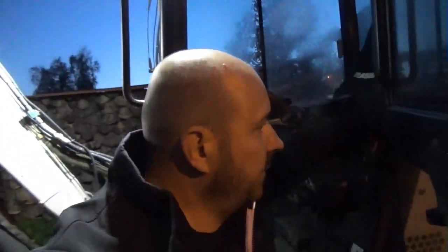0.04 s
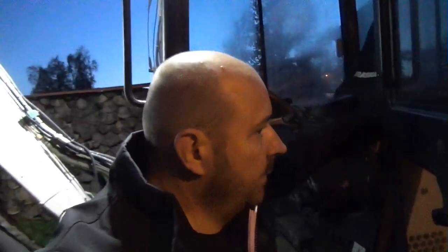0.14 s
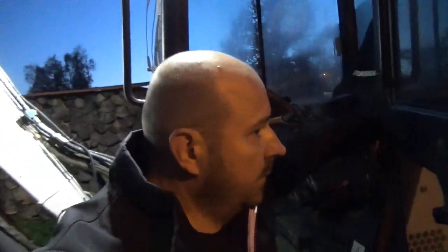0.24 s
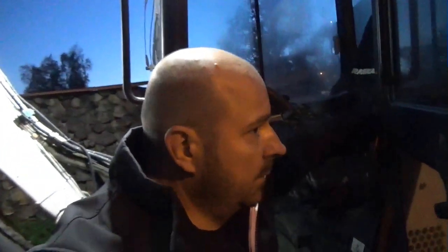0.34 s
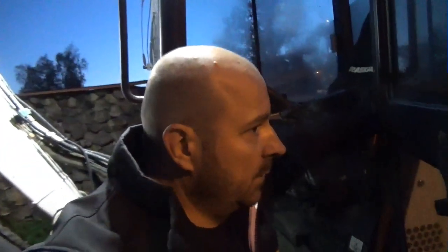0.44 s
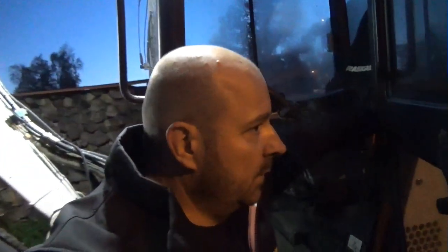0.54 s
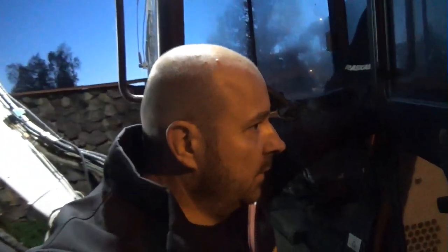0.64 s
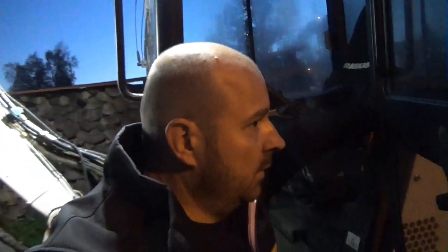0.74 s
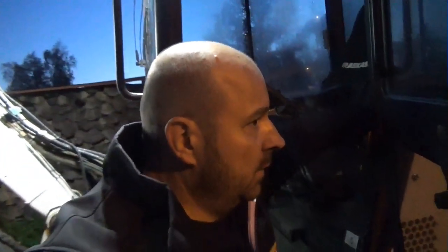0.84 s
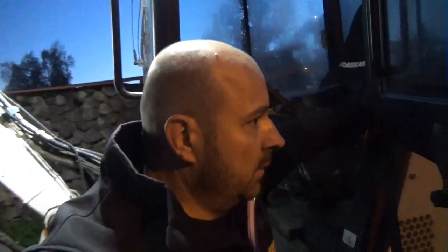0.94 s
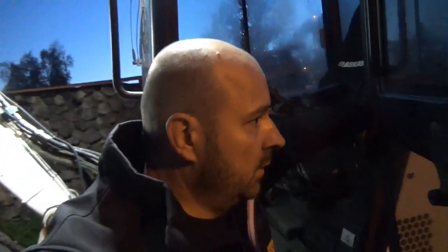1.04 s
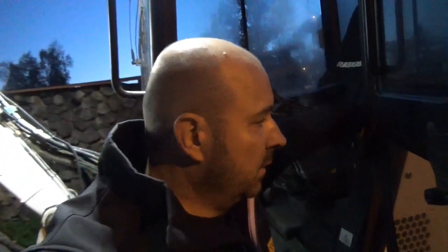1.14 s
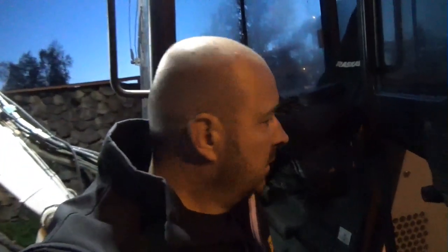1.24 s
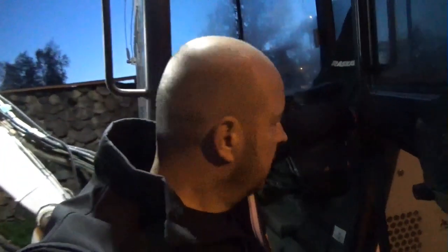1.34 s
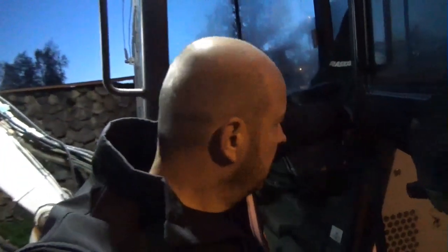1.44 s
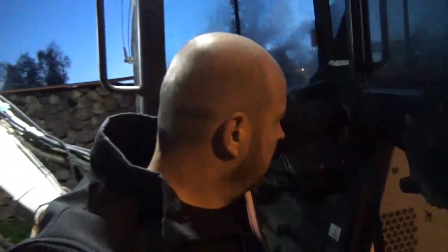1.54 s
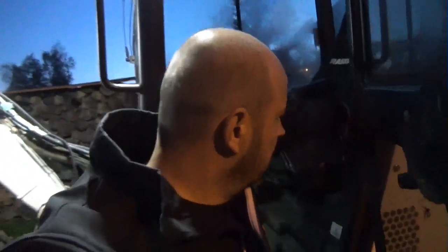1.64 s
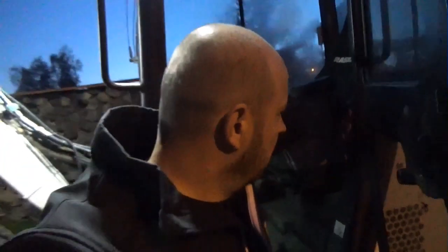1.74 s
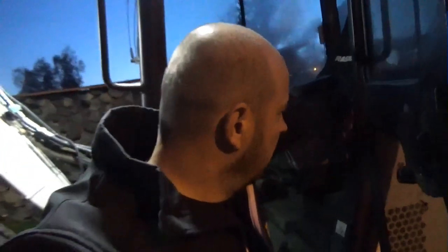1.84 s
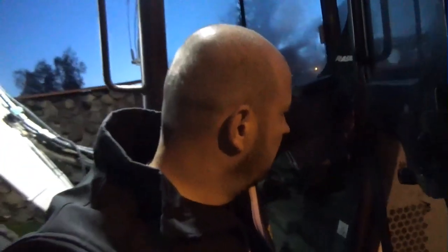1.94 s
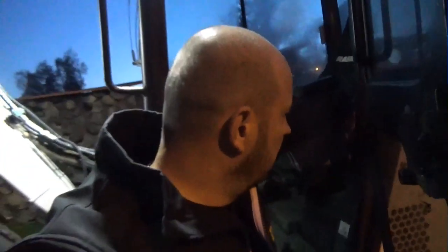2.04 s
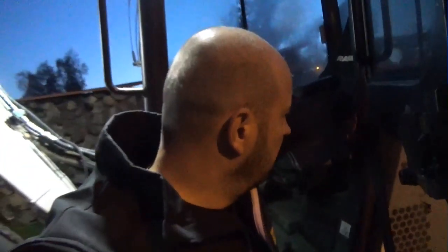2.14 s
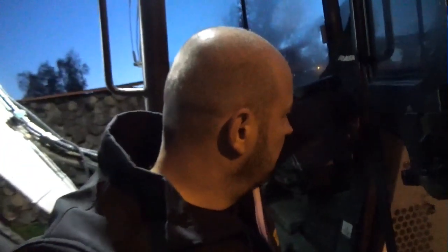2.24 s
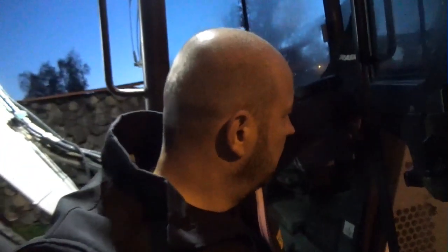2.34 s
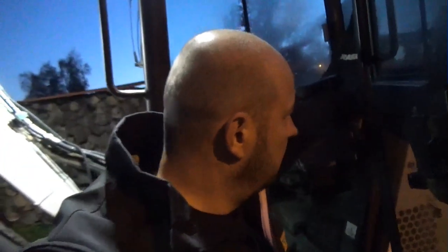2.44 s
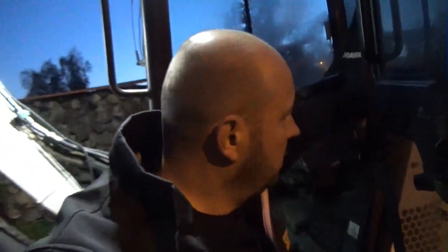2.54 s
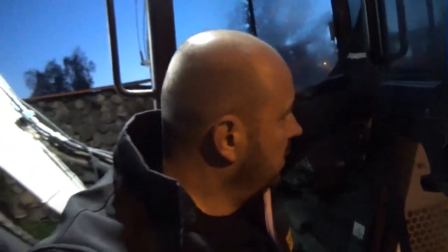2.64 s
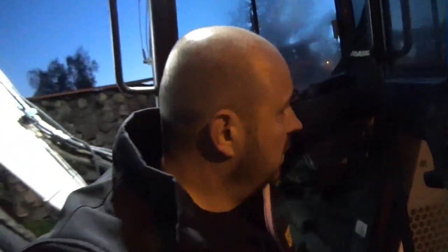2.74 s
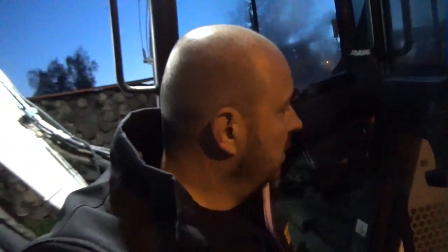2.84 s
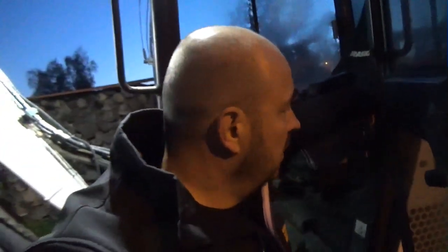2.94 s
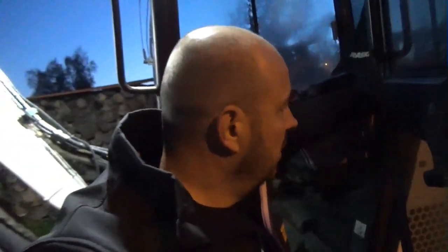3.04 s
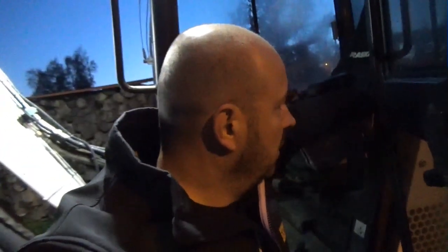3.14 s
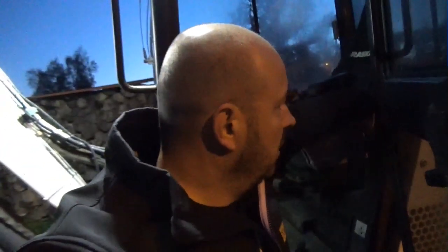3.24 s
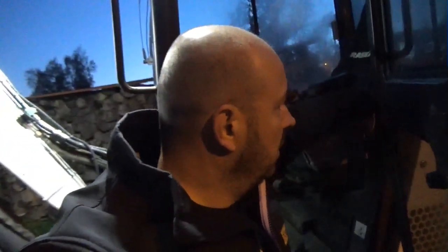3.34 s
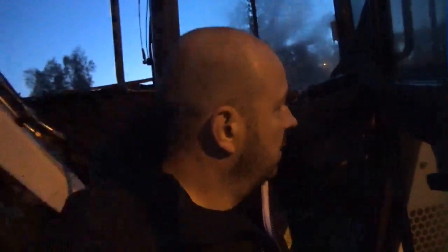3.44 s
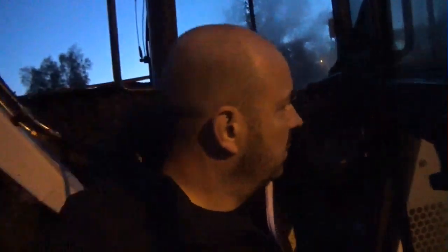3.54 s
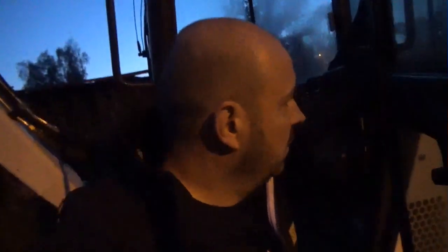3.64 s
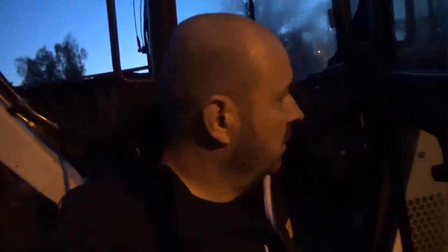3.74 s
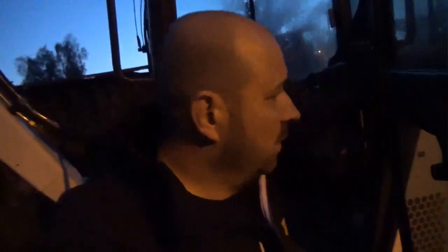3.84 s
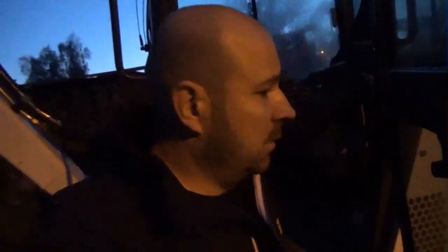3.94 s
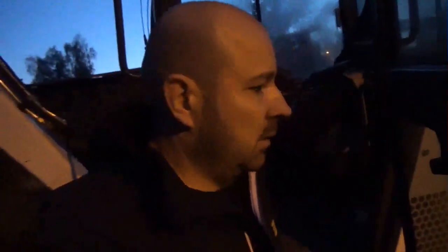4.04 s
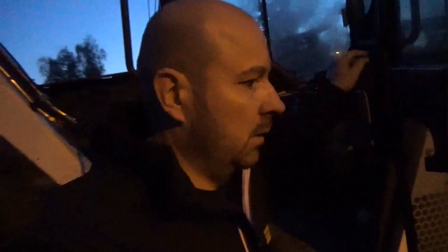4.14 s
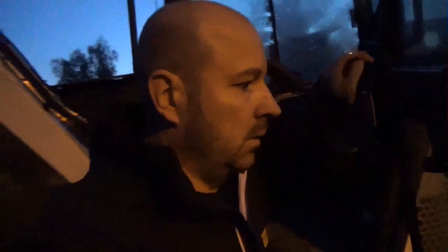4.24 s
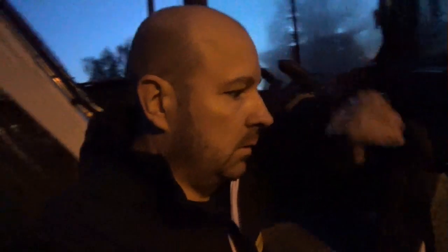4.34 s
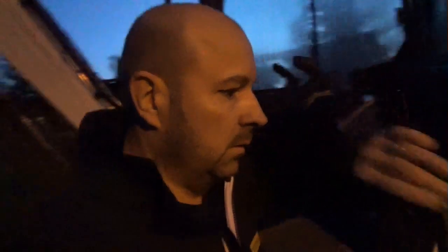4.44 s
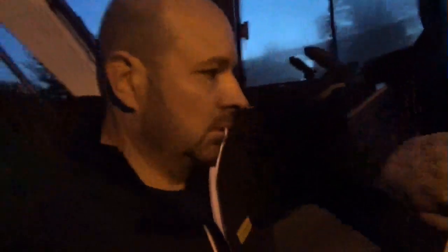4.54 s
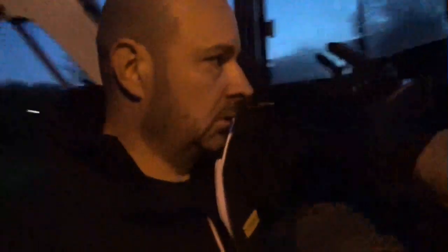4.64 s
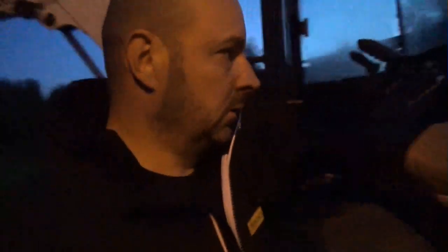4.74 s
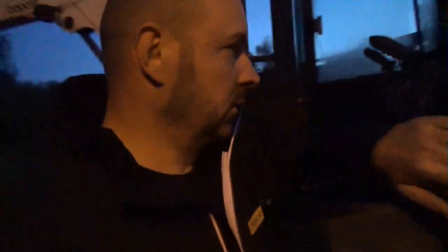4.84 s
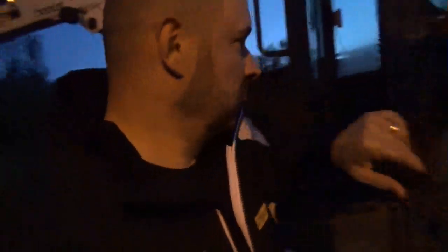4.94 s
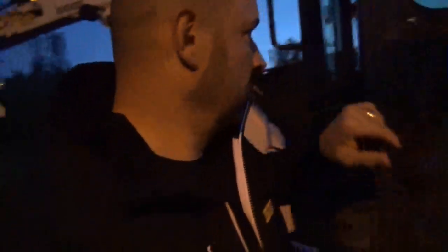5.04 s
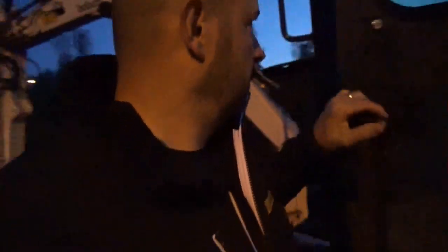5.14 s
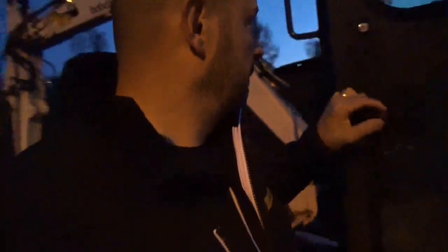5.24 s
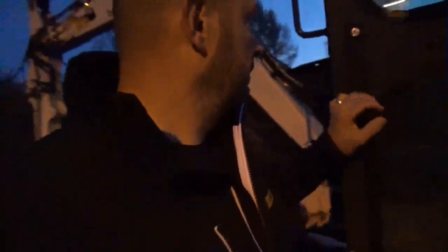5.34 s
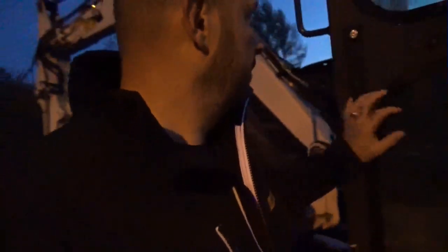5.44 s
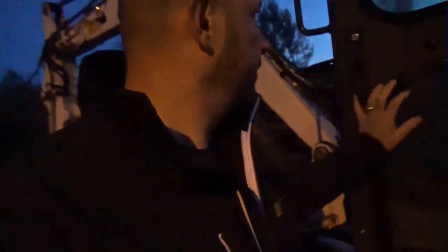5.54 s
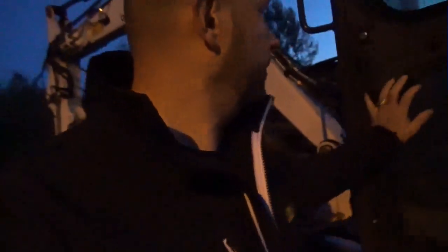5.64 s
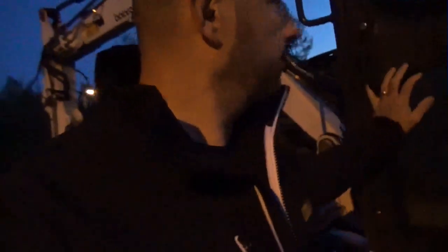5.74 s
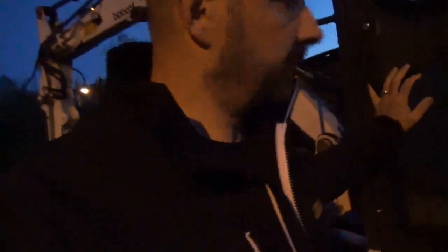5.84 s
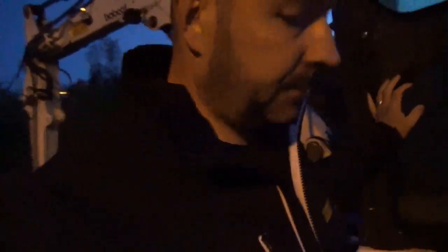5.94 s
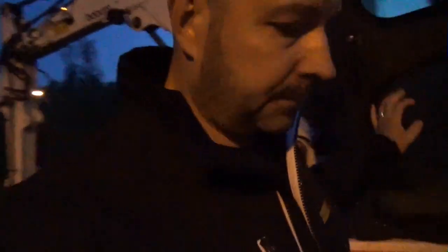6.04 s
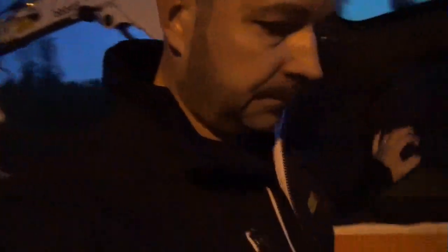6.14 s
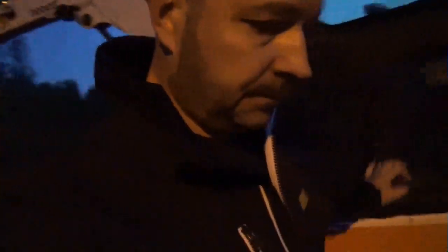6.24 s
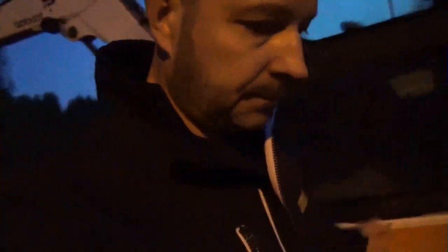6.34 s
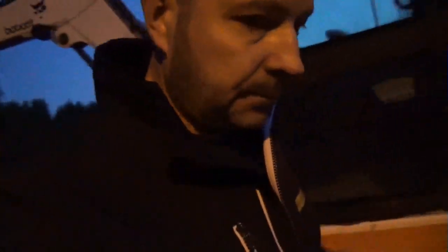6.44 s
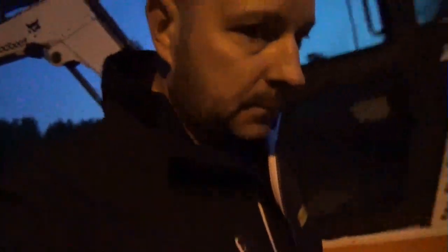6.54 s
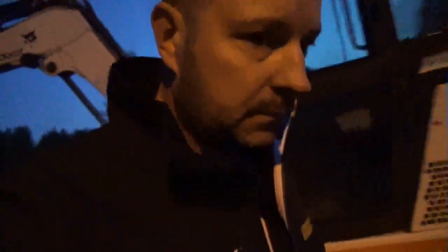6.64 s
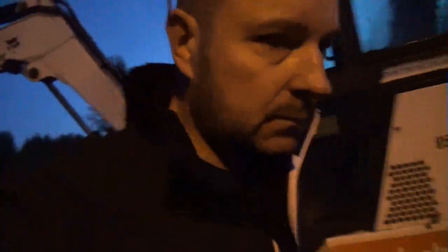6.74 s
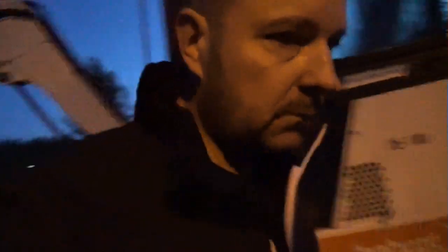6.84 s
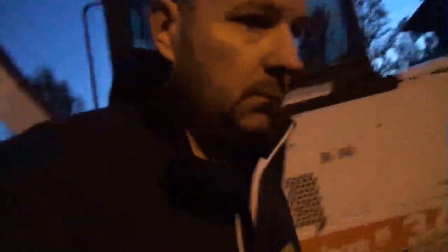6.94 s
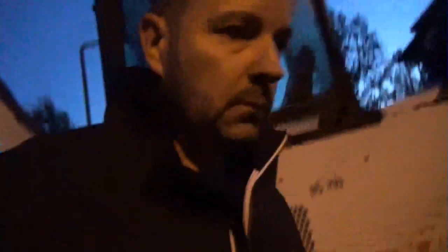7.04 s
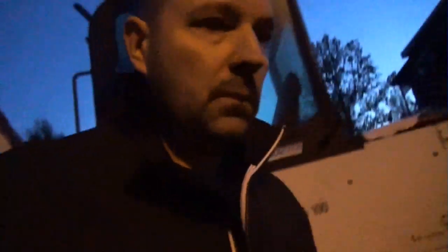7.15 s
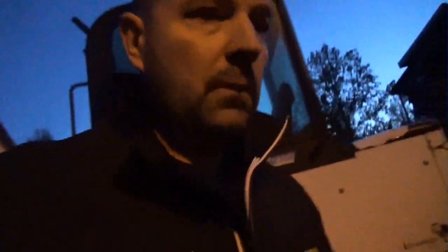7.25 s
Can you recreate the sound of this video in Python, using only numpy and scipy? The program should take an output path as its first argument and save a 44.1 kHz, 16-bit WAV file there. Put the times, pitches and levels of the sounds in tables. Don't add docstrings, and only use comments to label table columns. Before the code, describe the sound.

Over low far-off traffic and rustling cloth, metal catches click, a hinge scrapes and squeaks, a heavy cab door slams, and boots crunch grit.

```python
import sys
import numpy as np
from scipy import signal
from scipy.fft import rfft, irfft, next_fast_len
from scipy.io import wavfile
from scipy.ndimage import uniform_filter1d

SR = 44100
rng = np.random.default_rng(int(sys.argv[2]) if len(sys.argv) > 2 else 0)


def wrap_up_sound(samples):
    columns = np.atleast_2d(samples).T
    tamed = np.clip(columns, -1, 1)
    steps = np.round(tamed * 32767).astype(np.int16)
    wavfile.write(sys.argv[1], SR, steps)


def boost(x):
    u = np.asarray(x, float) / 20
    return 10 ** u


N = 322371

# time in s, tyre roar in
# dB, left minus right in dB, tyre note in Hz.
ROAD = [(0.0, -34, 4.5, 990), (0.75, -30.5, 4.5, 1160), (1.4, -31, 5.5, 980), (2.12, -32, 5, 870),
        (3.1, -33, 4.5, 960), (4.2, -32.5, 3.5, 1100), (4.8, -34.5, 3.5, 990), (5.6, -35.5, 2, 950),
        (5.9, -40.5, -1.5, 900), (6.5, -40.5, 4.5, 920), (7.04, -35, -4, 854), (7.31, -37, 2, 1010)]
# frequency in Hz, density in dB per Hz.
RUMBLE = [(15, -50), (35, -48), (60, -38), (85, -1.5), (110, 3.5), (140, 2), (190, -24), (300, -56)]
EXHAUST = [(100, -35), (180, -2), (330, -2), (520, -5), (900, -37)]
ROAR = [(250, -34), (550, -5.5), (950, -4), (1300, -5), (1840, -7), (2810, -19.5), (5000, -28.5),
        (11000, -51)]
RUSTLE = [(1180, -10), (2000, -6.5), (2460, -2.5), (3910, -5), (6820, -0.5), (10600, -3), (11000, -9),
          (14300, -48)]
# frequency in Hz, correlation as a ratio.
SAME = [(60, 1), (170, 0.93), (490, 0.92), (1390, 0.87), (3950, 1), (11200, 0.84)]
ROAR_MEAN_DB = -33
RUMBLE_DB, RUMBLE_FOLLOWS, RUMBLE_FADE_DB_PER_S = -39, 0.29, -0.29
EXHAUST_DB, EXHAUST_FOLLOWS, EXHAUST_RISE_DB_PER_S = -41.5, 0.46, 0.61

# start in s, length in s, level in dB.
DRONE = [
    (5.118, 0.5, -40.5),
    (6.403, 0.44, -42.5),
]
DRONE_HZ, DRONE_CLIMB_HZ_PER_S = 267, 11.6

# middle in s, half length in s, rubbing level in dB.
STROKES = [(0.018, 0.1, -41), (0.29, 0.13, -43), (0.575, 0.11, -42.5), (0.847, 0.09, -57),
           (1.075, 0.098, -48), (1.44, 0.096, -42), (1.804, 0.067, -44.5), (2.462, 0.17, -43.5),
           (2.663, 0.065, -42.5), (2.952, 0.091, -46.5), (4.09, 0.17, -38.5), (4.328, 0.074, -39.5),
           (4.554, 0.11, -38), (4.915, 0.28, -38), (5.652, 0.12, -38), (5.87, 0.11, -42.5),
           (6.264, 0.038, -43), (6.452, 0.051, -48), (6.606, .1, -49), (6.88, 0.12, -38.5), (7, 0.063, -34),
           (7.205, 0.094, -32.5)]
REST_DB = -50.5

# time in s, scrape level in dB.
SWING = [(4.86, -44), (4.92, -29.5), (5.0, -27.5), (5.15, -28), (5.22, -34), (5.3, -34.5), (5.38, -39),
         (5.46, -54)]
# frequency in Hz, width in Hz, level in dB.
HINGE = [(4570, 61, -0.5), (6290, 31, 5.5), (6920, 37, -11), (7850, 210, 7), (9930, 850, 0.5)]
# start in s, length in s, frequency in Hz, level in dB, overtones in dB.
SQUEAKS = [(5.07, .06, 4050, -42, -6), (5.074, .034, 8090, -10.5, -40), (5.1, .011, 8000, -10.5, -40),
           (5.11, .011, 7960, -11, -40), (5.119, .014, 8050, -21, -40), (5.22, .026, 2490, -14, -36),
           (5.241, .019, 3075, -5.5, -30), (5.244, .016, 2620, -27, -40), (5.262, .016, 2540, -30, -40),
           (5.342, .014, 3130, -16, -13), (5.361, .037, 2500, -15.5, -19), (5.366, .01, 3030, -26, -25),
           (5.405, .02, 2480, -36, -40), (7.19, .065, 1040, -36, -40)]
# start in s, length in s, start frequency in Hz, level in dB, fall in Hz.
JUMPS = [
    (5.211, .016, 3020, -26, 420),
    (5.237, .009, 2550, -25, -450),
    (5.353, .013, 3120, -19, 260),
]
# start in s, length in s, frequency in Hz, level in dB.
WHISTLES = [
    (2.43, .018, 5500, -42),
    (2.44, .016, 5800, -38),
    (2.432, .016, 6200, -45),
    (5.07, 0.062, 11970, -5.5),
    (5.095, 0.059, 15800, -4),
]
SLIP_SAG_HZ = 35

# start in s, ring level in dB, ring frequency in Hz.
GRIT = [(0.505, -13, 7800), (4.567, -20, 3700), (4.6684, -28, 4500), (5.866, -23, 6920), (5.882, -21, 7400),
        (6.386, -19, 7400), (6.617, -8.5, 8600), (6.647, -20, 9240), (6.719, -7, 9800), (6.745, -20, 8680),
        (6.7805, -9, 8500), (6.799, -9, 7340), (6.8073, -5, 7600), (6.8295, -10, 8500), (6.927, -13, 8300),
        (6.933, -15, 8000), (6.975, -12, 8700), (7.076, -27, 6290)]
GRIT_LOW_HZ, GRIT_LOW_DB, GRIT_S = 1850, -27, 0.0014

# start in s, high ring in dB, its frequency in Hz, low ring in dB, its frequency in Hz.
TICKS = [(2.702, -23, 8950, -26.5, 2940), (4.487, -18, 5600, -20, 2820), (4.501, -21, 6500, -25, 3500),
         (4.5088, -8.5, 7880, -24, 5700), (4.554, -8, 7650, -21, 3300), (4.625, -16, 7850, -18.5, 3320),
         (4.8847, -9, 7800, -16.5, 2920), (6.3583, -11.5, 7950, -19.5, 4770),
         (6.696, -2.5, 7850, -26, 1640), (6.79, -5, 8800, -34, 4800), (6.807, -10, 7200, -36, 4800),
         (6.813, -3, 7760, -29, 2440), (6.9917, -6, 4950, -15, 2300)]
SPRING = [(4.4956, -22, 10000, -19, 3600), (4.518, -20, 10500, -28, 3500), (4.552, -13, 8500, -34, 3500),
          (4.632, -30, 7500, -33, 3100), (4.6784, -32, 7000, -26.5, 3700), (4.8847, -35, 4500, -24, 1520),
          (6.81, -13, 7600, -32, 4800)]
SNAPS = [
    (.7135, -14, 6900, -11, 3550),
    (3.468, -7, 7300, -20, 520),
    (3.5465, -14, 9300, -6, 3700),
]
BUMPS = [(5.628, -25, 4020, -23.5, 1190), (5.707, -30, 7600, -24, 940), (5.717, -12.5, 1890, -20, 784),
         (5.725, -32, 2580, -20, 290), (5.751, -9, 3040, -23, 420), (5.761, -9, 6300, -11.5, 690),
         (5.767, -12, 2980, -12.5, 950), (6.873, -12, 7500, -21, 1600), (6.881, -17, 2000, -22, 900),
         (6.941, -20, 8800, -22.5, 825), (7.013, -18.5, 1270, -25.5, 225), (7.048, -12, 5840, -13.5, 856),
         (7.048, -14, 2800, -22.5, 210)]
TICK_S, SNAP_S, BUMP_S = 0.0015, 0.0014, 0.0065
# start in s, level in dB, frequency in Hz, length in s.
THUDS = [(0.326, -30, 385, 0.039), (3.666, -32, 332, 0.008), (3.921, -38, 251, .015),
         (5.813, -19.5, 394, 0.043), (6.056, -34.5, 350, 0.0063), (6.102, -27.5, 320, 0.0098),
         (6.118, -30, 210, 0.03), (7.085, -36, 192, .0082)]
THUD_TOP_DB, THUD_TOP_RATIO = -9, 4.7

# start in s, frequency in Hz, peak in dB, t60 in s.
RINGS = [(3.4695, 633, -19, .04), (3.477, 398, -22.5, 0.14), (3.5462, 3700, -10, 0.013),
         (3.548, 594, -21, 0.096), (3.556, 3170, -21, 0.1), (4.7418, 7400, -14, 0.1),
         (4.7419, 6760, -13, .12), (4.745, 5820, -19, 0.15), (4.745, 2480, -19.5, .09),
         (4.751, 1952, -17.5, 0.099), (4.751, 1016, -15.5, 0.093), (4.764, 808, -23.5, .14),
         (5.7425, 183, -5, 0.078), (5.855, 561, -22, 0.28), (5.875, 480, -24, 0.15),
         (.7135, 3550, -17.5, 0.063), (.715, 453, -22, 0.045), (4.757, 450, -23.5, 0.092),
         (5.751, 103, -1.5, .09), (5.805, 574, -21, 0.18), (5.83, 450, -24, 0.17), (5.865, 306, -17, 0.13),
         (5.74, 400, -13, .08), (5.765, 654, -12, 0.084), (5.785, 298, -17, 0.11), (5.905, 175, -17, 0.1),
         (6.841, 410, -10.5, 0.037), (6.858, 480, -17, 0.056), (6.872, 327, -21, 0.052),
         (6.889, 456, -16, .05), (6.991, 2920, -20, 0.022), (7.0135, 895, -18, 0.021),
         (6.876, 1000, -22, .04), (6.8805, 1470, -19, 0.028), (7.05, 950, -14.5, 0.04)]
RING_RISE_CYCLES = .6

# start in s, level in dB, length in s, lag of the body in s.
KNOCKS = [
    (0.325, -20, 0.018, 0.0052),
    (0.712, -15.5, 0.021, 0.00094),
    (3.466, -14, 0.022, 0.0033),
    (3.546, -9, 0.024, 0.0014),
    (4.476, -24, 0.08, 0.0091),
    (4.7432, -12.5, 0.028, 0.012),
    (5.732, -2, 0.015, 0.02),
    (6.835, -10.5, 0.015, 0.0039),
    (6.854, -17, 0.051, 0.0027),
]
# frequency in Hz, density in dB per Hz.
HANDLE = [(120, -43), (200, -13), (411, 1), (1310, -39), (2520, -8.5), (3890, -17), (8850, -3.5),
          (11000, -15)]
GRIP = [(120, -49), (400, -11), (2000, -9), (2900, -13), (4200, -13.5), (6880, -4), (9460, -5),
        (11000, -16)]
CATCH = [(120, -41), (250, -6.5), (500, -0.5), (1240, -14), (2060, -10.5), (5000, -13), (7300, -9.5),
         (11000, -13.5)]
LATCH = [(120, -33), (260, -7), (600, -3), (1020, -14), (1770, -7.5), (3500, -7.5), (5000, -11.5),
         (11000, -7)]
STRAP = [(1290, -40), (2200, -14), (2860, -2), (4870, -8), (5720, -2), (6730, -4), (11000, -2)]
LOCK = [(250, -36), (600, -7), (3300, -5), (3900, -18), (4600, -21), (5300, -5), (7600, -2), (11000, -23)]
EDGE_OF_DOOR = [(240, -20), (400, 6), (1090, -5), (1560, 5.5), (2670, -1), (4050, -13.5), (6200, -10.5),
                (11000, -24.5)]
STEP = [(88, -40), (150, -13), (441, -2), (1920, -19), (2660, -15.5), (4600, -23), (8100, -15),
        (11000, -14)]
TREAD = [(88, -50), (150, -5), (410, -1.5), (557, -6), (1470, -9), (2660, -20.5), (7680, -16),
         (11000, -15.5)]
STRUCK = [HANDLE, GRIP, CATCH, LATCH, STRAP, LOCK, EDGE_OF_DOOR, STEP, TREAD]

# frequency in Hz, level in dB, t60 in s.
PANELS = [(39.36, -12, 0.44), (68, -14, 0.7), (96, -9, 0.67), (202, -13.5, 0.74), (265.4, -14, 0.57),
          (301, -20, 0.6), (350, -14.5, 0.4), (403, -19, 0.14), (576, -22, 0.62), (691, -9, 0.21),
          (950, -19, 0.13)]
SLAM_S = 5.742
BOOM_HZ, BOOM_DB, BOOM_RISE_S, BOOM_T60_S = 145.3, -4, 0.008, 0.71
PRESSED_S, RELEASE_S, RELEASE_DB = 0.13, 0.007, -12.5
TWIN_HZ, TWIN_DB, TWIN_T60_S = 164.9, -1.5, 0.43
REBOUND_S, REBOUND_HZ, REBOUND_DB, REBOUND_T60_S = .16, 161.6, -12.5, 0.4
SHELL_JOINS_S, SHELL_JOIN_LENGTH_S = 0.019, .003

# frequency in Hz, gain in dB.
EDGE = [(40, 0), (11050, 0), (11300, -44), (13200, -50), (14300, -42), (15500, -52), (16500, -90)]


def evened(x):
    return x / np.sqrt(np.mean(x ** 2) + 1e-20)


def read(points, hz):
    f, value = np.transpose(points)
    return np.interp(np.log(hz + 1), np.log(f + 1), value)


def along(rows, t):
    s, *columns = np.transpose(rows)
    return [np.interp(t, s, c) for c in columns]


def add(mix, s, sound, pan_db):
    part = mix[:, round(s * SR):][:, :sound.shape[-1]]
    part += (sound * boost(np.array([[pan_db / 2], [-pan_db / 2]])))[:, :part.shape[1]]


def wavering(count, size):
    smooth = uniform_filter1d(rng.standard_normal(count), size=size)
    return 1 + .5 * evened(uniform_filter1d(smooth, size=size))


def ringing(x, hz, width):
    return signal.lfilter(*signal.iirpeak(min(hz, 11000), max(hz / width, .5), SR), x)


def hiss(colour, patchy_db, alike):
    hz = np.fft.rfftfreq(1024, 1 / SR)
    a, b, c, d, patches = rng.standard_normal((N // 256 + 5, 513, 5)).T
    patches = uniform_filter1d(patches, size=10, axis=0)
    patches = evened(uniform_filter1d(patches, size=10, axis=1))
    same = np.clip(alike * read(SAME, hz), -1, 1)[:, None]
    left = a + 1j * b
    right = same * left + np.sqrt(1 - same ** 2) * (c + 1j * d)
    z = np.array([left, right]) * boost(read(colour, hz)[:, None] + patchy_db * patches)
    return evened(signal.istft(z, nperseg=1024, noverlap=768)[1][:, :N])


def road():
    t = np.arange(N) / SR
    roar_db, pan_db, note_hz = along(ROAD, t)
    swell_db = roar_db - ROAR_MEAN_DB
    rumble_db = RUMBLE_DB + RUMBLE_FOLLOWS * swell_db + RUMBLE_FADE_DB_PER_S * t
    exhaust_db = EXHAUST_DB + EXHAUST_FOLLOWS * swell_db + EXHAUST_RISE_DB_PER_S * t
    engines = boost(rumble_db + 0.9) * hiss(RUMBLE, 0.39, 1.0)
    engines = engines + boost(exhaust_db + 1.0) * hiss(EXHAUST, 0.98, 1.0)
    wide = hiss(ROAR, 0.93, 1.0)
    turn = np.exp(2j * np.pi * np.cumsum(note_hz) / SR)
    r = np.exp(-np.pi * 170 / SR)
    note = 2 * (turn * signal.lfilter([1 - r], [1, -r], wide / turn)).real
    roar = boost(roar_db + 0.03) * evened(wide + note)
    return engines * boost(np.outer([.3, -.3], pan_db)) + roar * boost(np.outer([.5, -.5], pan_db))


def drone(length_s, db):
    hz = DRONE_HZ + DRONE_CLIMB_HZ_PER_S * np.arange(0, length_s, 1 / SR)
    tone = np.sin(2 * np.pi * np.cumsum(hz) / SR)
    return boost(db) * wavering(len(hz), 1200) * tone * signal.windows.tukey(len(hz), .3)


def cloth():
    t = np.arange(0, N + 200, 100) / SR
    strokes = sum(boost(db + 2.0) ** 2 * np.exp(-((t - s) / half_s) ** 2) for s, half_s, db in STROKES)
    level = np.sqrt(boost(REST_DB) ** 2 + strokes)
    crackle = boost(1.6 * uniform_filter1d(rng.exponential(1, N) ** 2, size=30))
    return np.interp(np.arange(N) / SR, t, level) * hiss(RUSTLE, 1.86, 0.89) * evened(crackle)


def hinge():
    rub = rng.standard_normal(N)
    bands = sum(boost(db) * ringing(rub, hz, width_hz + 650) for hz, width_hz, db in HINGE)
    t = np.arange(N) / SR
    moving = (t > SWING[0][0]) * (t < SWING[-1][0])
    return boost(along(SWING, t)[0]) * moving * evened(bands)


def squeak(length_s, hz, db, overtones_db, sag_hz=SLIP_SAG_HZ):
    u = np.linspace(0, 1, round(max(length_s, .004) * SR))
    wobble = 1 + 200 / hz * uniform_filter1d(rng.standard_normal(len(u)), size=200)
    turn = 2 * np.pi * np.cumsum((hz - sag_hz * u) * wobble) / SR
    overtones = (np.sin(2 * turn) + .6 * np.sin(3 * turn)) * (hz < SR / 8)
    tone = np.sin(turn) + boost(overtones_db) * overtones
    return boost(db) * np.sqrt(2) * tone * np.sin(np.pi * u ** 0.97) ** 1.9


def echoed(x):
    t = np.arange(4000) / SR
    tail = rng.standard_normal((2, len(t))) * boost(-60 * t / 0.096) * (t > .003)
    wet = signal.fftconvolve(x[None], tail / np.linalg.norm(tail[0]), axes=1)
    return np.pad(x, (0, len(t) - 1)) + boost(-12.0) * wet


def tick(high_db, high_hz, low_db, low_hz, length_s, sharp):
    t = np.arange(3000) / SR
    near, far = rng.standard_normal((2, len(t)))
    scratch = np.exp(-(t / max(length_s, 5e-4)) ** 0.81) + boost(-17.5 - 60 * t / 0.085)
    touch = (near + 0.27 * np.array([far, -far])) * scratch
    touch[:, 0] += sharp
    high = ringing(ringing(touch, high_hz, 0.4 * high_hz), high_hz, 1.0 * high_hz)
    low = ringing(ringing(touch, low_hz, 0.29 * low_hz), low_hz, 2.1 * low_hz)
    wide = ringing(touch, low_hz, 1.1 * low_hz)
    low = low / abs(low).max() + boost(-8.0) * wide / abs(wide).max()
    return boost(high_db) * high / abs(high).max() + boost(low_db) * low


def ring(hz, db, t60_s):
    t = np.arange(0, .4, 1 / SR)
    shape = (1 - np.exp(-t * hz / RING_RISE_CYCLES)) * boost(-60 * t / t60_s)
    return boost(db) * shape / shape.max() * np.sin(2 * np.pi * hz * t)


def knock(db, length_s, lag_s, part):
    t, hz = np.arange(6000) / SR, np.fft.rfftfreq(6000, 1 / SR)
    near, far, fine = rng.standard_normal((3, len(t)))
    modes_db = 3.5 * evened(uniform_filter1d(fine[:len(hz)], size=9)) * hz / (hz + 1500)
    z = rfft(near + 0.25 * np.array([far, -far])) * boost(read(part, hz) + modes_db)
    low_share = 1 / (1 + (hz / 2600) ** 4)
    fall = 0.34 * np.exp(-t / 0.0063) + np.exp(-(t / length_s) ** 2.0) + boost(-6 - 60 * t / 0.18)
    metal = irfft(z * (1 - low_share)) * (1 - np.exp(-t / 0.0014))
    body = irfft(z * low_share) * (1 - np.exp(-(t / lag_s) ** 2))
    return boost(db) * (metal + body) / np.std(irfft(z)) * fall


def shudder(t):
    noise = rng.standard_normal(len(t))
    low = boost(-12.5 - 60 * t / 0.53) * evened(ringing(ringing(noise, 230, 160), 240, 200))
    high = boost(-17 - 60 * t / 0.2) * evened(ringing(ringing(noise, 480, 260), 480, 320))
    deep = boost(-23.0 - 60 * t / 1.9) * evened(ringing(ringing(noise, 97, 70), 88, 90))
    return (deep + low + high) * (1 - np.exp(-t / 0.019))


def slam():
    t = np.arange(0, .9, 1 / SR)
    free_s = RELEASE_S * np.logaddexp(0, (t - PRESSED_S) / RELEASE_S)
    release_db = RELEASE_DB / (1 + np.exp((PRESSED_S - t) / RELEASE_S))
    boom = boost(BOOM_DB + release_db - 60 * free_s / BOOM_T60_S) * np.sin(2 * np.pi * BOOM_HZ * t)
    boom += boost(TWIN_DB - 60 * t / TWIN_T60_S) * np.sin(2 * np.pi * TWIN_HZ * t)
    late = np.maximum(t - REBOUND_S, 0)
    rebound = boost(REBOUND_DB - 60 * late / REBOUND_T60_S) * np.sin(2 * np.pi * REBOUND_HZ * late)
    boom += rebound * (1 - np.exp(-late / 0.006))
    joined = (1 - np.exp(-t / BOOM_RISE_S)) / (1 + np.exp((SHELL_JOINS_S - t) / SHELL_JOIN_LENGTH_S))
    out = (np.sqrt(2) * boom * joined + shudder(t)) * np.ones((2, 1))
    for hz, db, t60_s in PANELS:
        shiver = wavering(len(t), 900)
        phase = rng.random() + np.array([[.04], [-.04]])
        mode = np.sin(2 * np.pi * (hz * t + phase))
        out += boost(db - 60 * t / t60_s) * shiver * mode * (1 - np.exp(-t / 0.0067))
    return out


def scene():
    mix = road() + cloth() + hinge()
    for s, *row in DRONE:
        add(mix, s, drone(*row), 1.5)
    for s, *slip in SQUEAKS:
        add(mix, s, echoed(squeak(*slip)), -1.8)
    for s, length_s, hz, db, fall_hz in JUMPS:
        add(mix, s, echoed(squeak(length_s, hz, db, -14, fall_hz)), -1.8)
    for s, *slip in WHISTLES:
        add(mix, s, squeak(*slip, -40), -.6)
    for s, db, hz in GRIT:
        add(mix, s, tick(db + 1.5, hz, db + GRIT_LOW_DB + 5.5, GRIT_LOW_HZ, GRIT_S, 6.1), -.4)
    for s, high_db, high_hz, low_db, low_hz in TICKS:
        add(mix, s, tick(high_db + 1.5, high_hz, low_db + 5.0, low_hz, TICK_S, 9.7), -.4)
    for s, high_db, high_hz, low_db, low_hz in SPRING:
        add(mix, s, tick(high_db - 1.0, high_hz, low_db + 5.5, low_hz, TICK_S, 11), -.4)
    for s, high_db, high_hz, low_db, low_hz in SNAPS:
        add(mix, s, tick(high_db + 6.5, high_hz, low_db, low_hz, SNAP_S, 23.0), -.4)
    for s, high_db, high_hz, low_db, low_hz in BUMPS:
        add(mix, s, tick(high_db + .3, high_hz, low_db + 3.5, low_hz, BUMP_S, 1.0), -1.2)
    for s, db, hz, length_s in THUDS:
        add(mix, s, tick(db + THUD_TOP_DB, hz * THUD_TOP_RATIO, db + 8.0, hz, length_s, 1.2), -1.2)
    for s, *mode in RINGS:
        add(mix, s, ring(*mode), -.8)
    for (s, *blow), part in zip(KNOCKS, STRUCK):
        add(mix, s, knock(*blow, part), -.7)
    add(mix, SLAM_S, slam(), -1.1)
    return mix


def band_limit(x):
    return signal.sosfilt(signal.butter(12, 16300, fs=SR, output="sos"), x)


def record(dry):
    knee, room = .55, 1.04 - .55
    over = np.maximum(abs(dry) - knee, 0)
    rounded = np.clip(dry, -knee, knee) + np.sign(dry) * room * np.tanh(over / room)
    size = next_fast_len(N)
    edge = boost(read(EDGE, np.fft.rfftfreq(size, 1 / SR)))
    cut = irfft(rfft(rounded, size) * edge, size)[:, :N]
    return band_limit(np.clip(cut, -1, 1))


dry = scene()
out = record(dry)
wrap_up_sound(out)
```